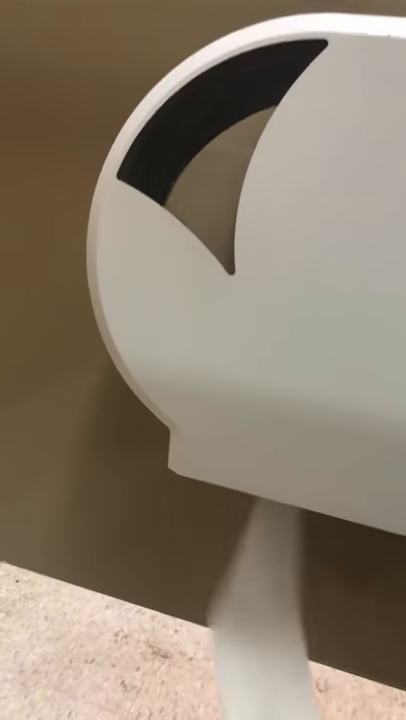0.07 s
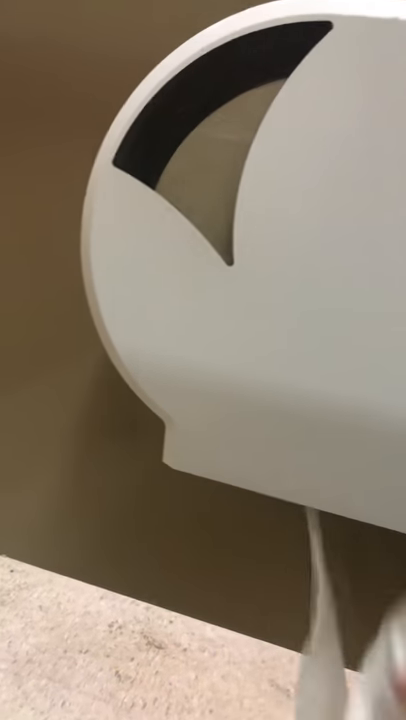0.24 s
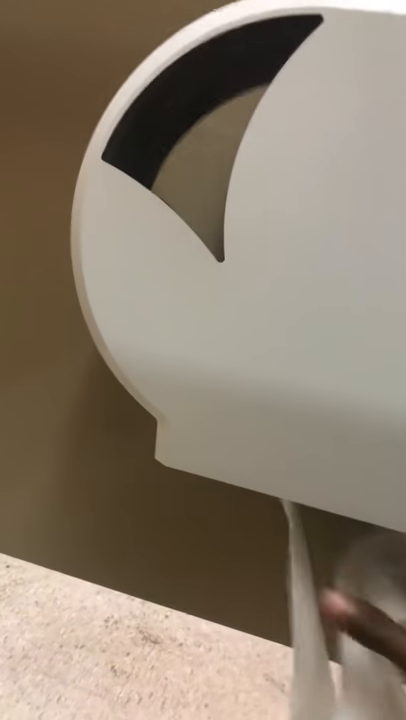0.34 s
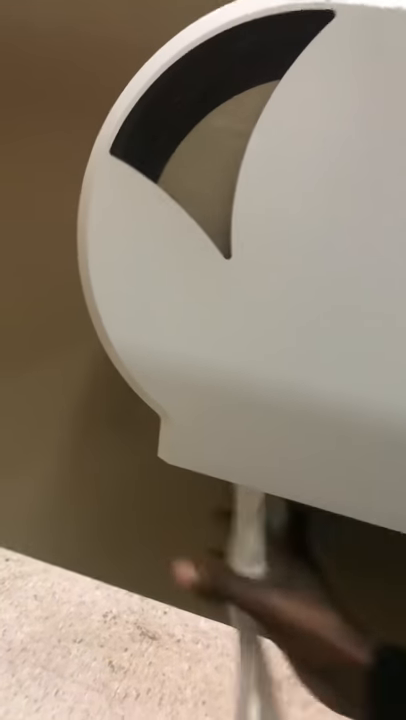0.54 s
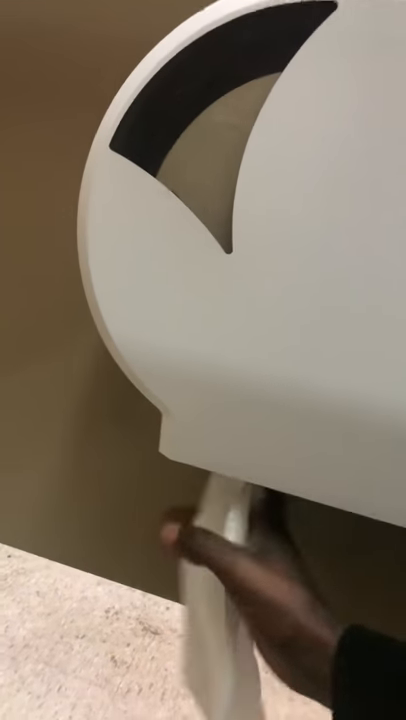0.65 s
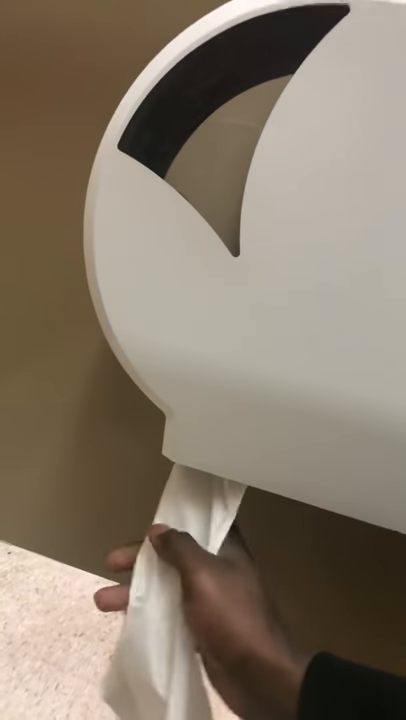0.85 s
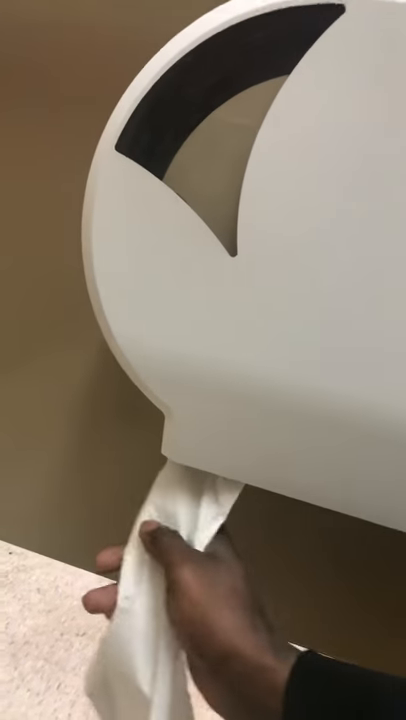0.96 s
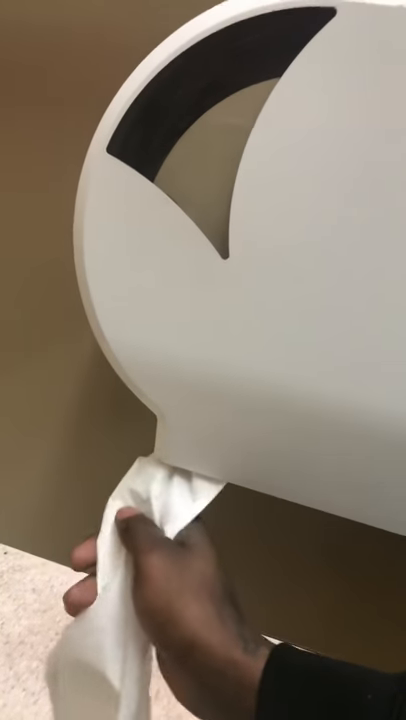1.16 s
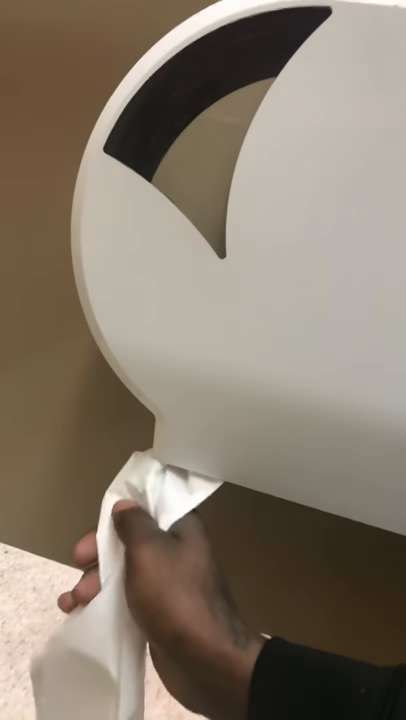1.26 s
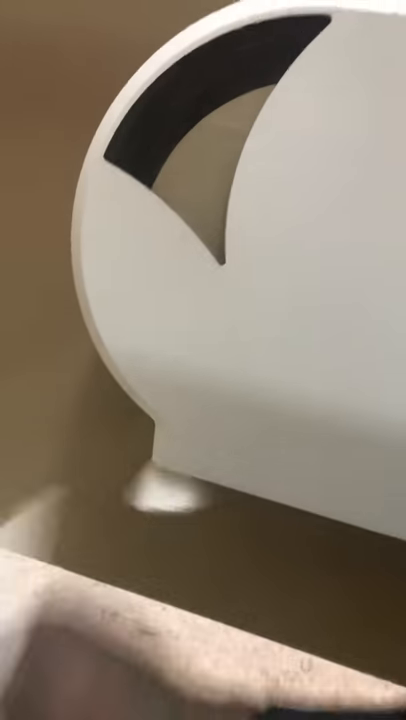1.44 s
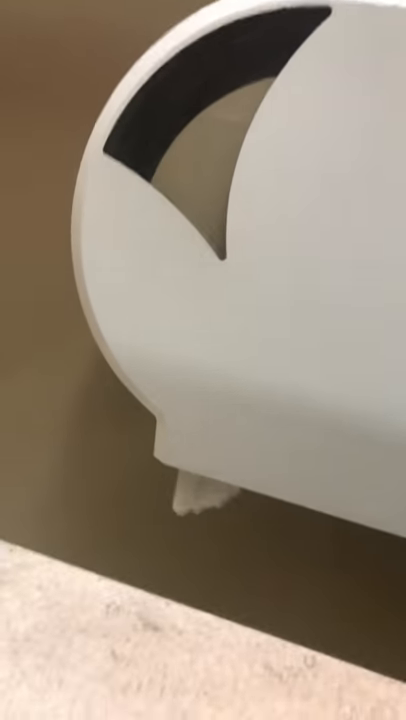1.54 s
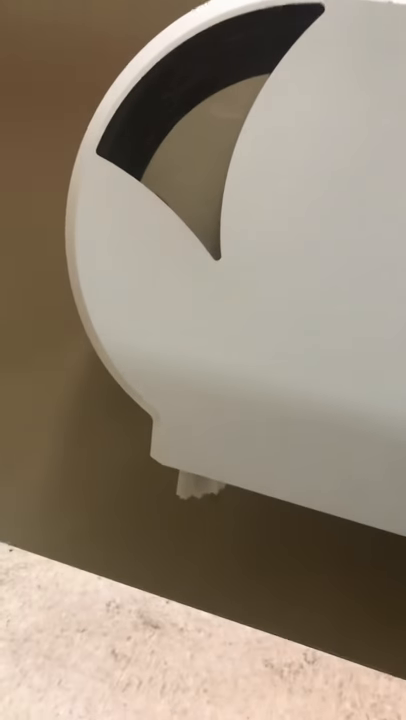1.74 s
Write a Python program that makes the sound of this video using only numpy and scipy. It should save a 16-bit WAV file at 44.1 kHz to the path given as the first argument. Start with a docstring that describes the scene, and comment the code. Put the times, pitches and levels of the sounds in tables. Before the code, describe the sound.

Toilet paper is pulled from a plastic dispenser, the roll rubbing and clunking as the sheet catches twice. After a faint rustle comes one quick rip, over a steady ventilation hum in a slightly echoing tiled restroom.

```python
"""A toilet roll turns and knocks in a big, hollow plastic wall dispenser, over the hum of ventilation.
As the paper is pulled, it snags twice on the toothed edge, jerks the case and makes the wall panel boom.
The loose sheet rustles softly, then tears off as its fibres and perforations break.
The tiled restroom adds a short echo."""
import sys
import numpy as np
from scipy import signal
from scipy.fft import rfft, irfft, next_fast_len
from scipy.io import wavfile

SR = 44100
rng = np.random.default_rng(int(sys.argv[2]) if len(sys.argv) > 2 else 0)


def pcm_store(signal):
    """Save signal as 16-bit PCM."""
    levels = np.round(np.clip(np.atleast_2d(signal), -1, 1) * 32767)
    wavfile.write(sys.argv[1], SR, levels.astype(np.int16).T)


N = 79380

# tone colour of the ventilation (f/Hz, level/dB)
VENT_COLOUR = [(15, -46), (25, -7.5), (69, -0.5), (144, -1.5), (198, -10.5), (215, -13), (246, -5.5),
               (274, -17), (349, -9.5), (410, -16.5), (523, -19.5), (567, -24.5), (703, -22), (804, -25.5),
               (1050, -25.5), (1750, -35), (2170, -35.5), (6210, -43.5), (15500, -58)]
# how long the room echoes; t60 is the time to fade by 60 dB (f/Hz, t60/s)
ROOM_FADE = [(80, 0.99), (300, 0.36), (700, 0.47), (1500, 0.32), (5000, 0.22), (14000, .2)]
# bounces off nearby surfaces (delay/s, gain)
BOUNCES = [(.0019, 0.19), (.0043, 0.12), (.0071, 0.22), (0.0108, 0.17)]
# loose paper sliding through the hand (t/s, level/dB)
RUSTLE_LEVEL = [(0, -61.5), (.1, -70.5), (.15, -61.5), (.2, -71.5), (.3, -61.5), (.55, -68.5), (.66, -63.5),
                (.76, -68), (.92, -64.5), (1.02, -72.5), (1.35, -71), (1.62, -63), (1.7, -86)]
# tone colour of that rustle (f/Hz, level/dB)
LOOSE_PAPER_COLOUR = [(300, 4), (1000, 3), (2500, 0.5), (4500, -5.5), (6800, -4), (8500, -10.5),
                      (11000, -15), (16000, -16)]
# the wall panel's modes, the tones it rings with (f/Hz, level/dB, t60/s)
PANEL_MODES = [(86.35, 2.5, 0.54), (131.7, -9.5, 0.36)]
# tugs that reach the wall panel (t/s, level/dB)
PANEL_TUGS = [(0.1472, -39.5), (0.2535, -37.5), (0.3441, -35), (0.383, -30), (0.4507, -30), (1.497, -33.5)]
# the dull clatter in each knock (f/Hz, level/dB)
THUD_COLOUR = [(60, -25), (200, -1), (450, 4.5), (780, -12), (1600, -7.5), (2500, -21), (5000, -36.5),
               (16000, -76)]
# the roll rubbing as it turns on its hub (t/s, level/dB)
RUB_LEVEL = [(0, -48), (.06, -48), (.12, -51.5), (.16, -46.5), (.21, -46), (.24, -40.5), (.265, -38),
             (.29, -36.5), (.33, -46.5), (.36, -38), (.415, -23.5), (.44, -42), (.52, -47), (.6, -59.5)]
# that rubbing, heard through the hollow roll (f/Hz, level/dB)
RUB_COLOUR = [(60, -13), (170, -5.5), (250, -1.5), (330, 0.5), (420, -10), (520, -22), (580, -4),
              (650, -6.5), (780, -14.5), (960, -13), (1120, -23.5), (1500, -19), (1800, -26.5),
              (2400, -30.5), (5000, -42.5), (16000, -61)]
# the roll drops against its hub (t/s, level/dB)
ROLL_DROPS = [(0.0742, -35.5), (.159, -38.5), (0.2242, -27), (0.2276, -21.5), (.285, -31), (.304, -29.5)]
# ringing tones of the hollow roll (f/Hz, level/dB, t60/s)
ROLL_MODES = [(258, -6, 0.042), (306, 2, 0.058), (585, -15, 0.064), (626.5, -10.5, 0.13), (905, -19, 0.15),
              (956.5, -16, .13), (1243, -17, 0.048), (1490, -22.5, 0.081), (1787, -26.5, 0.09)]
# the tight sheet jerks the case (t/s, level/dB)
CASE_JERKS = [(.359, -19.5), (.387, -23.5), (0.4098, -21), (.450, -37), (1.478, -23.5), (1.5008, -26)]
# ringing tones of the plastic case (f/Hz, level/dB, t60/s)
CASE_MODES = [(264.7, -10.5, 0.15), (294.6, 2.5, .105), (342, -8.5, 0.19), (370.5, -6.5, 0.38),
              (418, -16, 0.23), (507, -19.5, 0.24), (589.5, -6.5, 0.12), (625, -13, 0.16),
              (862.3, -13.5, 0.16), (948, -20.5, 0.18), (1225, -22.5, 0.09), (1382, -13.5, 0.11)]
# the tight sheet rasping over the teeth (t/s, level/dB)
RASP_LEVEL = [(.335, -66), (.352, -41), (.372, -37.5), (.39, -51), (.40, -39), (.43, -38), (.46, -44),
              (.5, -64)]
# tone colour of that rasp (f/Hz, level/dB)
RASP_COLOUR = [(100, -26), (200, -3), (400, 6.5), (700, 1), (1000, 1), (1600, -2.5), (3000, -12),
               (6500, -22), (9000, -33), (16000, -32)]
# the sheet snags on the teeth (t/s, level/dB, time to rise 20 dB/s, time to fall 20 dB/s)
SNAG_BURSTS = [(0.3614, -32, .0055, 0.0126), (0.4111, -30, 0.0092, 0.0055)]
# tone colour of a snag (f/Hz, level/dB)
SNAG_BURST_COLOUR = [(100, -23), (400, 4), (1500, 9), (3000, -7), (5200, -6.5), (6600, 0), (7800, -8.5),
                     (10500, -15), (13000, -12.5), (16000, -20)]
# single perforations giving way (t/s, level/dB)
PERFORATION_SNAPS = [(1.4550, -34), (1.474, -36), (1.4892, -24.5), (1.501, -34), (1.52, -36.5),
                     (1.5283, -46)]
# tone colour of those snaps (f/Hz, level/dB)
PERFORATION_COLOUR = [(100, -10), (400, 3), (1400, 6), (2800, -2.5), (4200, -3.5), (5200, -5), (6800, -9),
                      (9000, -15.5), (15500, -22)]
# the tear running across the sheet (t/s, level/dB)
TEAR_LEVEL = [(1.38, -74), (1.42, -57), (1.452, -50), (1.459, -39), (1.467, -39.5), (1.474, -38),
              (1.484, -40), (1.491, -28), (1.497, -32), (1.508, -43), (1.529, -43), (1.535, -73)]
# tone colour of the tearing fibres (f/Hz, level/dB)
FIBRE_COLOUR = [(100, -10), (200, 7), (380, 6), (600, 3.5), (800, -3), (1000, 1.5), (1400, -3),
                (2100, -4.5), (4200, -8), (5000, -12.5), (6800, -10.5), (8000, -19), (11000, -20),
                (15500, -29)]

FIBRES_PER_S, FIBRE_SPREAD_DB = 4000, 3
CASE_ECHO_DB, PAPER_ECHO_DB = -10.5, -12
TIME = np.arange(N) / SR


def amp(db):
    """Turn decibels into a gain to multiply by."""
    return 10 ** (np.asarray(db) / 20)


def unit(x):
    """Scale a sound so that its average strength (rms) is 1."""
    return x / np.sqrt(np.mean(x ** 2) + 1e-20)


def along(points, hz):
    """Read between (f/Hz, value) points on a log frequency axis."""
    freqs, values = np.transpose(points)
    return np.interp(np.log(hz + 1), np.log(freqs + 1), values)


def level(points):
    """A gain curve through (t/s, level/dB) points; it opens 30 ms early and is silent after the last."""
    times, db = np.transpose(points)
    return amp(np.interp(TIME, times, db, right=-120)) * (TIME >= times[0] - .03)


def since(start):
    """Seconds since a moment, zero before it."""
    return np.maximum(TIME - start, 0)


def filtered(x, response):
    """Multiply each frequency in a sound by response(hz)."""
    size = next_fast_len(N + SR // 2)
    hz = np.fft.rfftfreq(size, 1 / SR)
    return irfft(rfft(x, size) * response(hz), size)[:N]


def coloured(x, colour):
    """Give a sound a tone colour, at strength 1."""
    return unit(filtered(x, lambda hz: amp(along(colour, hz))))


def grains(per_s, spread_db):
    """Tiny clicks of uneven size at random times."""
    sizes = amp(spread_db * np.clip(rng.standard_normal(N), -2, 2))
    return (rng.random(N) < per_s / SR) * sizes * rng.choice([-1, 1], N)


def ring(modes, start, attack_s, spread_db):
    """A struck object rings with fading tones, each randomly a bit louder or softer."""
    t = since(start)
    tones = 0
    for hz, db, t60 in modes:
        strength = amp(db + spread_db * rng.standard_normal())
        tones += strength * amp(-60 * t / t60) * np.sin(2 * np.pi * hz * t)
    return tones * (1 - np.exp(-t / attack_s))


def knock(modes, start, attack_s, thud_db=-14, thud_t60_s=0.079):
    """A soft knock: ringing tones and a short, dull clatter."""
    t = since(start)
    burst = rng.standard_normal(N) * (t > 0) * amp(-60 * t / thud_t60_s)
    thud = coloured(burst, THUD_COLOUR) * np.std(burst)
    return ring(modes, start, attack_s, spread_db=2) + amp(thud_db) * thud


def ventilation(level_db=-45.5):
    """Moving air makes a steady, low rush."""
    return amp(level_db) * coloured(rng.standard_normal(N), VENT_COLOUR)


def room_echo(x, build_up_s=0.0028):
    """The tiled room's echo, in which high tones fade sooner than low ones."""
    hz, t, spectrum = signal.stft(rng.standard_normal(SR), SR, nperseg=256)
    fade = amp(-60 * t / along(ROOM_FADE, hz)[:, None])
    _, tail = signal.istft(spectrum * fade, SR, nperseg=256)
    tail *= 1 - np.exp(-np.arange(len(tail)) / SR / build_up_s)
    return signal.fftconvolve(x, tail / np.linalg.norm(tail))[:N]


def near_bounces(x):
    """A sound plus its first bounces off the case and the stall, each a delayed, softer copy."""
    return filtered(x, lambda hz: 1 + sum(g * np.exp(-2j * np.pi * hz * delay) for delay, g in BOUNCES))


def rustle():
    """The hanging sheet makes a soft, dense crackle."""
    return level(RUSTLE_LEVEL) * coloured(grains(per_s=5000, spread_db=6), LOOSE_PAPER_COLOUR)


def panel_booms():
    """The tugs set the wall panel booming."""
    return sum(amp(db) * ring(PANEL_MODES, t, attack_s=0.0033, spread_db=4.5) for t, db in PANEL_TUGS)


def turning_roll():
    """The hollow roll sticks, slips and knocks on its hub."""
    drops = sum(amp(db) * knock(ROLL_MODES, t, attack_s=0.00068) for t, db in ROLL_DROPS)
    rubbing = level(RUB_LEVEL) * coloured(grains(per_s=1200, spread_db=3), RUB_COLOUR)
    return drops + rubbing


def case_knocks():
    """Each jerk of the sheet makes the plastic case ring."""
    return sum(amp(db) * knock(CASE_MODES, t, attack_s=0.0026) for t, db in CASE_JERKS)


def rasp():
    """The tight sheet drags over the toothed edge."""
    return level(RASP_LEVEL) * coloured(grains(per_s=2500, spread_db=4), RASP_COLOUR)


def snags():
    """Fibres catch on the teeth and break in two short bursts."""
    gain = 0
    for peak, db, rise, fall in SNAG_BURSTS:
        below_peak_db = 20 * np.maximum((peak - TIME) / rise, (TIME - peak) / fall)
        gain += amp(db - below_peak_db)
    return gain * coloured(grains(FIBRES_PER_S, FIBRE_SPREAD_DB), SNAG_BURST_COLOUR)


def snaps(t60_s=0.015):
    """Each perforation gives way all at once, with a crack that dies quickly."""
    gain = sum(amp(db - 60 * since(t) / t60_s) * (TIME > t) for t, db in PERFORATION_SNAPS)
    return gain * coloured(rng.standard_normal(N), PERFORATION_COLOUR)


def tear(case_db=-17):
    """Fibres break across the sheet, and the teeth pass the shaking on to the case."""
    fibres = grains(FIBRES_PER_S, FIBRE_SPREAD_DB)
    gain = level(TEAR_LEVEL)
    case_ring = ring(CASE_MODES, start=0, attack_s=0.00068, spread_db=2.5)
    shaken_case = signal.fftconvolve(unit(fibres) * gain, case_ring / np.linalg.norm(case_ring))[:N]
    return gain * coloured(fibres, FIBRE_COLOUR) + amp(case_db) * shaken_case


def scene():
    """The dispenser and the paper sound in the room, over the ventilation."""
    dispenser = turning_roll() + case_knocks()
    paper = near_bounces(snags() + rasp() + tear() + snaps() + rustle())
    echo = room_echo(amp(CASE_ECHO_DB) * dispenser + amp(PAPER_ECHO_DB) * paper)
    return (dispenser + paper + panel_booms() + echo + ventilation())[None]


def record(dry):
    """The microphone loses the deepest bass and the very highest treble."""
    low_cut_hz, top_hz = 28, 15750
    return filtered(dry[0], lambda hz: (hz < top_hz) * (1 - 1 / (1 + (hz / low_cut_hz) ** 4)))[None]


dry = scene()
out = record(dry)
pcm_store(out)
```